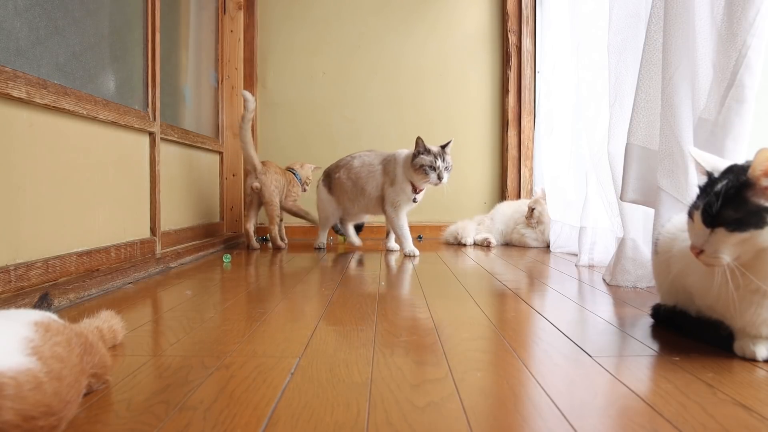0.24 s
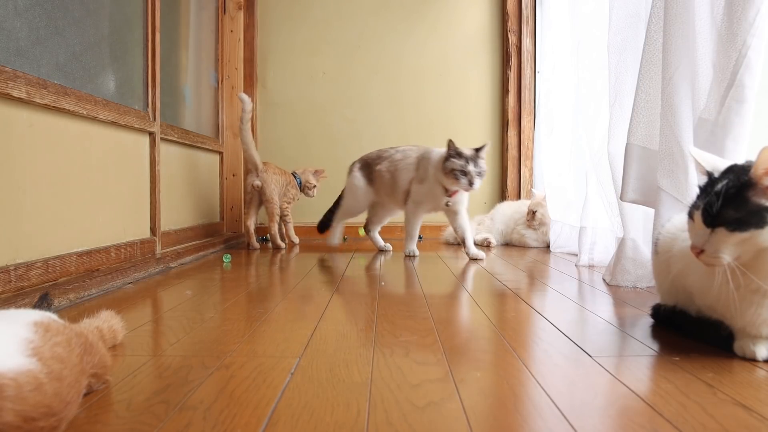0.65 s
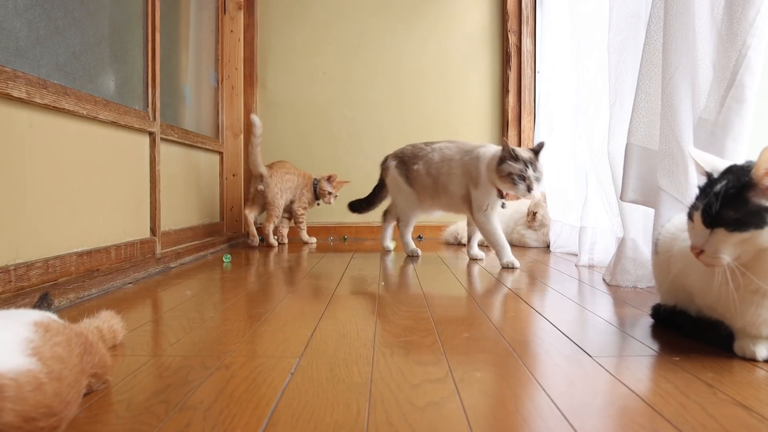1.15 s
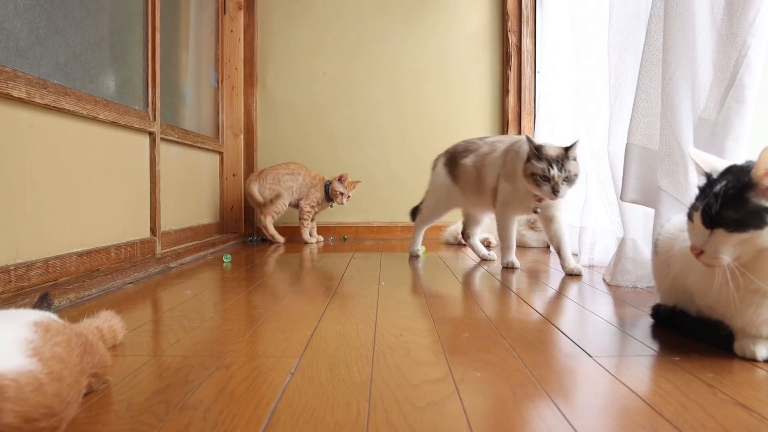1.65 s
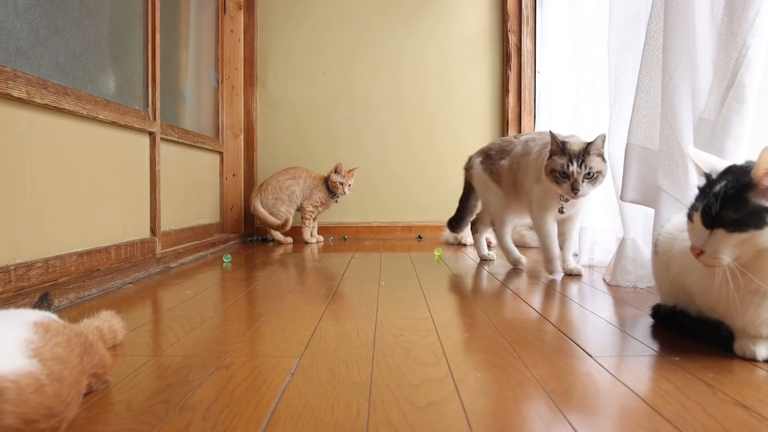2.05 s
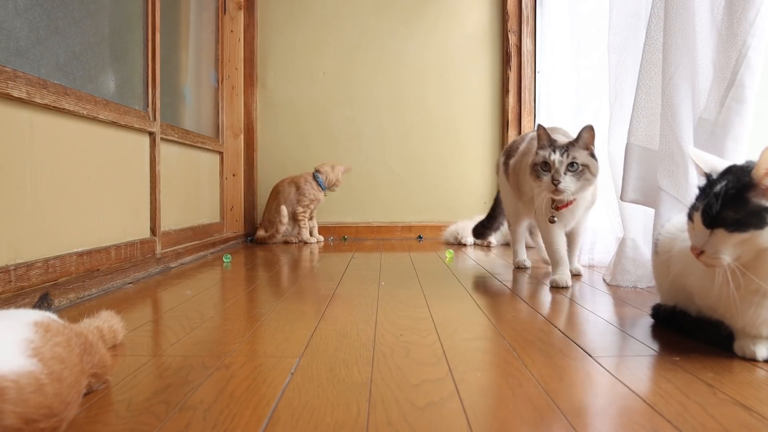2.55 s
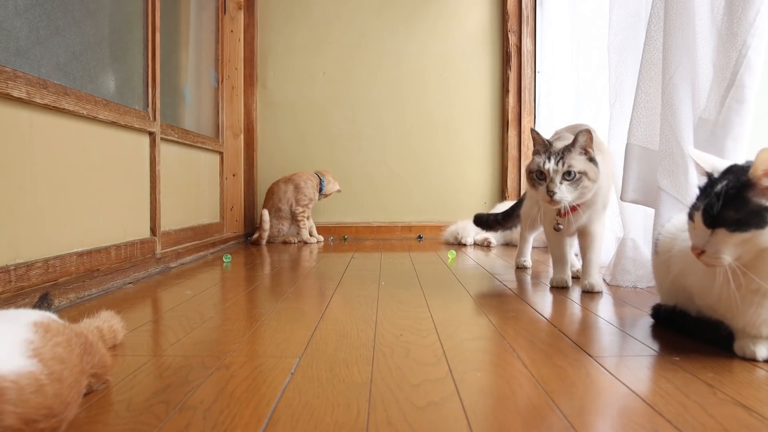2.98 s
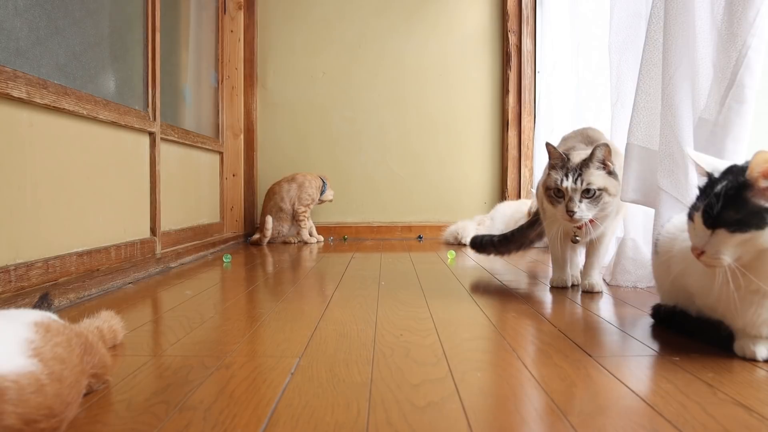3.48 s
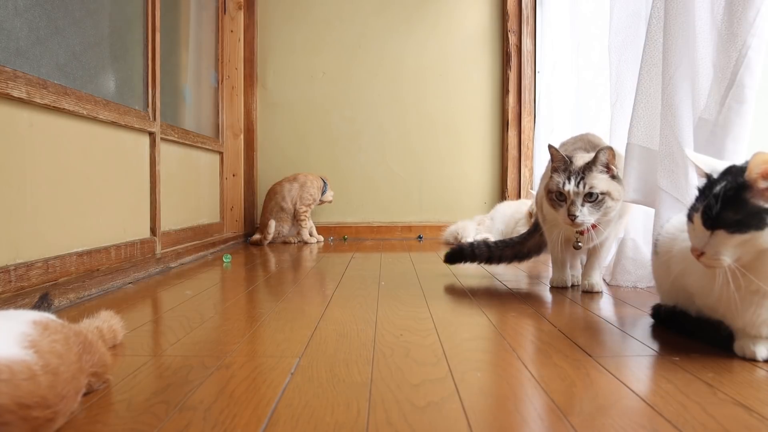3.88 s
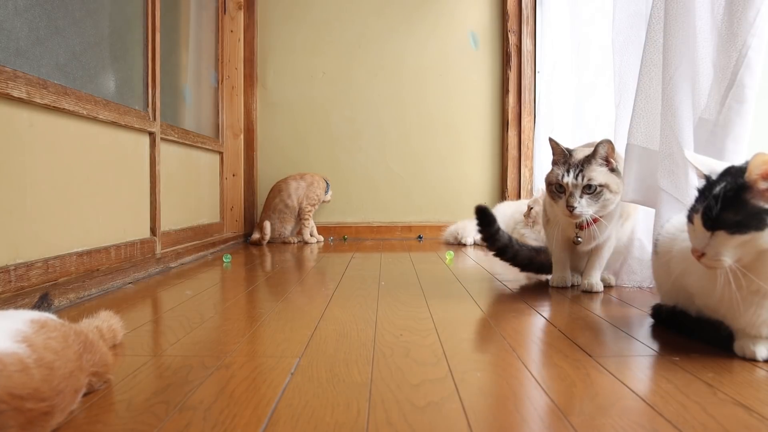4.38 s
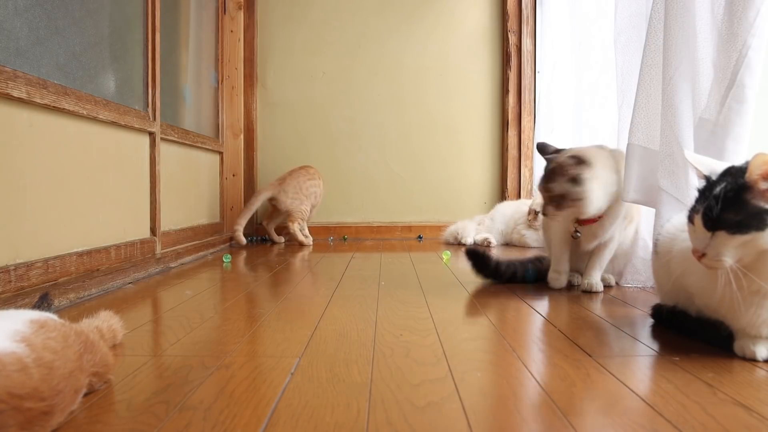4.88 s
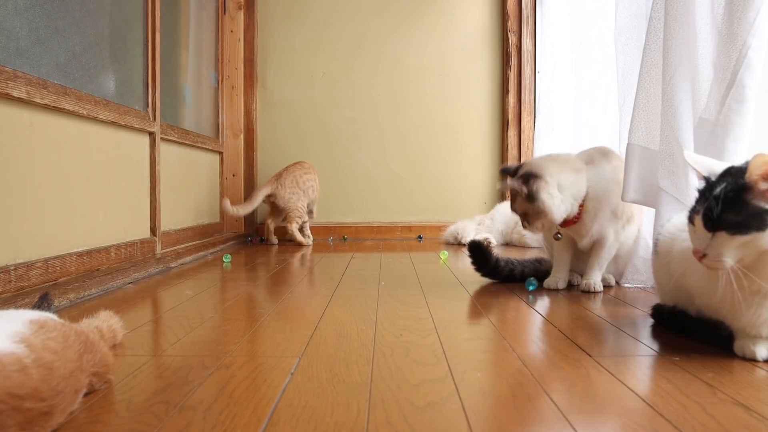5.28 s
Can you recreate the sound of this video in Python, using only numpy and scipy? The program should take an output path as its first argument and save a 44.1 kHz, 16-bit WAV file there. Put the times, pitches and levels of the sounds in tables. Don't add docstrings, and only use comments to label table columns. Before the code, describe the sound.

Dull, boomy bounces of rubber balls on indoor floorboards, with loud single landings, two dying runs, faint paw pads and a steady hum.

```python
import sys
import numpy as np
from scipy import signal
from scipy.fft import rfft, irfft, next_fast_len
from scipy.io import wavfile

SR = 44100
rng = np.random.default_rng(int(sys.argv[2]) if len(sys.argv) > 2 else 0)


def digitize_waveform(pressure):
    field = np.atleast_2d(pressure).T
    bounded = np.clip(field, -1, 1)
    quanta = np.round(bounded * 32767).astype(np.int16)
    wavfile.write(sys.argv[1], SR, quanta)


def to_linear_factor(level_db):
    exponent = np.asarray(level_db, float) / 20
    return 10 ** exponent


N = 243873
LEAD = SR // 10
AFTER = np.arange(int(.65 * SR)) / SR
THIRD_OCTAVE_EDGES_HZ = 25 * 2 ** (np.arange(29) / 3)

# start in seconds, peak in dB, bass in dB, slap in dB.
EARLIER_BOUNCES = [
    (-0.05, -8, -8, -29),
]
# start in seconds, peak in dB, bass in dB, slap in dB.
PANEL_BOUNCES = [
    (0.103, -11.5, -23.5, -26),
    (4.948, -26, -19, -14),
]
# start in seconds, peak in dB, bass in dB, slap in dB.
FAR_BOUNCES = [
    (0.384, -4.5, -15.5, -34.5),
    (0.624, -6, -12.5, -33),
    (0.82, -11, -6.5, -32),
]
# start in seconds, peak in dB.
SETTLING_KNOCKS = [
    (1.733, -29),
    (1.755, -35),
    (1.788, -38),
    (1.81, -33.5),
    (1.847, -38),
    (1.942, -35.5),
]
# start in seconds, peak in dB, bass in dB, slap in dB.
NEAR_BOUNCES = [
    (2.887, -1, -7.5, -31.5),
]
# start in seconds, peak in dB, bass in dB, slap in dB.
THROWN_BOUNCES = [
    (3.971, 0, -9.5, -31.5),
]
# start in seconds, peak in dB, bass in dB, slap in dB.
REBOUND_BOUNCES = [
    (4.046, -0.75, -5, -33.5),
]
# start in seconds, peak in dB, bass in dB, slap in dB.
MID_BOUNCES = [
    (4.728, -4, -11, -30.5),
    (5.016, -12, -10, -28.5),
    (5.148, -14, -10, -28.5),
    (5.288, -24, -4.5, -35),
    (5.367, -19, -9.5, -33),
    (5.434, -21.5, -9.5, -30),
    (5.489, -33.5, -10.5, -22),
]

# frequency in Hz, level in dB, packet length in ms.
PANEL_BOARDS = [(260, -4.5, 14), (431, 5.5, 19), (646, -11, 20.5), (790, -14.5, 12), (1016, -27, 33),
                (1444, -30, 37)]
# frequency in Hz, level in dB, packet length in ms.
FAR_BOARDS = [(140.6, 4, 20), (236, -4, 25.6), (326.4, -1, 20), (460.4, -2.5, 19.6), (635, -11.5, 27),
              (1055, -26, 22), (1615, -27.5, 20)]
# frequency in Hz, level in dB, packet length in ms.
RUN_BOARDS = [(132.7, 3, 18.5), (271, -13, 26.5), (334, -13, 20), (447.4, -7.5, 13.3), (618, -16.5, 12),
              (1448, -31, 14), (1898, -34.5, 18), (2800, -36.5, 14)]
# frequency in Hz, level in dB, packet length in ms.
NEAR_BOARDS = [(101.4, -1, 39.4), (180, -6, 18), (320, -14, 15), (461, -12.5, 16.5), (619, -12, 20),
               (833, -12.5, 17), (1080, -17, 12), (1526, -26.5, 27), (2950, -27, 5)]
# frequency in Hz, level in dB, packet length in ms.
THROWN_BOARDS = [(179.6, -2.5, 18), (301, -3.5, 20), (446.4, -2, 26), (618, -14, 20), (843, -12, 16),
                 (1500, -23, 16), (2580, -24, 7.1)]
# frequency in Hz, level in dB, packet length in ms.
REBOUND_BOARDS = [(141, -6.5, 18.3), (214, -1, 13), (452, -13, 22), (621, -13, 18), (850, -17.5, 18),
                  (1302, -24.5, 18)]
# frequency in Hz, level in dB, packet length in ms.
MID_BOARDS = [(93.7, -4, 96), (159.3, -1.5, 32.6), (238, -0.5, 21.4), (328.5, -2.5, 24.6), (418.6, -5, 20),
              (561, -10, 16.6), (720, -16.5, 24), (1290, -28.5, 18)]

# frequency in Hz, level in dB per Hz.
PANEL_TAIL = [(35, -42), (60, -39), (179, -19), (245, 6), (336, -11), (423, 3.5), (717, -18), (811, -18.5),
              (2210, -32.5), (4020, -48)]
# frequency in Hz, level in dB per Hz.
FAR_TAIL = [(35, -41.5), (60, -5.5), (104, 3), (221, -2), (478, -9.5), (634, -13), (680, -17), (870, -27.5),
            (2060, -30), (4020, -40)]
# frequency in Hz, level in dB per Hz.
RUN_TAIL = [(35, -28), (60, -3.5), (169, -2), (303, -13), (430, -9), (797, -32.5), (1640, -29),
            (1820, -34.5), (2170, -36), (4020, -47)]
# frequency in Hz, level in dB per Hz.
NEAR_TAIL = [(35, -28.5), (60, -2), (224, -3.5), (292, -4.5), (348, -7.5), (870, -16), (1190, -27),
             (1640, -23), (1920, -38.5), (2980, -36.5), (4020, -37)]
# frequency in Hz, level in dB per Hz.
THROWN_TAIL = [(35, -37.5), (60, -8), (217, -1.5), (645, -4.5), (783, -16), (917, -22), (1040, -14.5),
               (1450, -22.5), (1890, -38), (2170, -31.5), (4020, -38)]
# frequency in Hz, level in dB per Hz.
MID_TAIL = [(35, -30.5), (60, 0), (102, 0), (145, -2.5), (209, -2), (394, -7), (591, -11.5), (933, -32),
            (2330, -36.5), (4020, -50)]

# slap in dB, its low and high limits in Hz, its T60 in seconds.
PANEL_MIX = (-15.5, -51.5, -41, -5, 950), (3.5, 1.2, -13, 38), (-24.5, 899, 2500, 0.13)
FAR_MIX = (-19, -33, -34, -9, 799.5), (4, 0.74, -15.5, 42), (-29, 998.5, 4500.5, 0.1)
RUN_MIX = (-20, -30, -17.5, -15, 740), (3.5, 0.84, -15, 40), (-23.5, 1300, 3300, 0.03)
NEAR_MIX = (-15.5, -55, -19.5, 5, 1151), (3, 0.6, -23, 60.5), (-6.5, 1000, 5400, 0.0033)
THROWN_MIX = (-16.5, -52.5, -29, -1.5, 1100), (3, 0.7, -19, 40), (-16, 1000, 4500, 0.03)
REBOUND_MIX = (-17.5, -21.5, -28, -7, 1050), (4.0, 0.26, -13, 49.5), (-24, 1000, 3300, 0.01)
MID_MIX = (-17, -22, -24, -10, 921), (2.5, 0.45, -16.5, 45), (-23.5, 999, 4002, .025)

# frequency in Hz, T60 in seconds.
JOISTS = [(48.5, 0.68), (91.5, 0.72)]
# frequency in Hz, T60 in seconds.
ROOM_T60 = [(60, 0.36), (150, 0.47), (300, 0.29), (700, 0.3), (2000, 0.37), (5000, .35), (12000, .2)]
# frequency in Hz, left-right correlation from -1 to 1.
TAIL_LIKENESS = [(100, .9999), (230, 1), (500, 0.98), (1000, 0.63), (3000, 0.9), (10000, .5)]
# frequency in Hz, level in dB.
TREBLE = [(3800, 1.27), (5000, -0.5), (6300, -12), (8000, -19), (10000, -31), (13000, -32), (16000, -46.5)]
# frequency in Hz, level in dB per Hz.
HUM_COLOUR = [(15, -37), (25, -3.5), (48, -10), (104, 1.5), (128, -10.5), (146, -9.5), (219, -16.5),
              (238, -12.5), (334, -17.5), (380, -18.5), (545, -21), (799, -21.5), (1250, -23),
              (2310, -25.5), (4020, -32.5)]
# frequency in Hz, left-right correlation from -1 to 1.
HUM_LIKENESS = [(60, .9995), (110, 1), (190, 0.88), (350, 0.42), (620, 0.11), (2000, 0.84), (8000, 0.72)]
# start in seconds, length in seconds, level in dB, low and high limits in Hz.
SCUFFS = [
    (0.001, .012, -52.5, 900, 12000),
    (4.945, .07, -43, 1150, 1750),
    (4.97, .04, -62, 4500, 7500),
    (5.21, .045, -63, 5100, 6900),
]
# start in seconds, peak in dB, frequency in Hz.
PAWS = [(0.3, -40, 122), (2.104, -37.5, 129), (2.2, -38, 104), (2.338, -40, 99.6), (2.555, -33, 100),
        (3.158, -33, 102), (3.326, -35, 90), (3.452, -35, 101), (3.573, -35.5, 88), (3.652, -36, 83.4),
        (4.269, -40, 87), (4.413, -41.5, 86.1), (4.531, -42, 95.5)]
# start in seconds, frequency in Hz, level in dB, T60 in seconds.
COLLAR_BELL = (3.895, 10849.5, -70, .2)
# frequency in Hz, level of the right port over the left in dB.
RIGHT_GAIN = [(200, .2), (700, .5), (1500, 2), (5000, 2.6), (12000, 1.5)]


def at_hz(points, hz):
    points = np.array(points)
    return np.interp(np.log(hz), np.log(points[:, 0]), points[:, 1])


def band(x, low_hz, high_hz):
    edges = [low_hz, min(high_hz, .45 * SR)]
    return signal.sosfilt(signal.butter(2, edges, "band", fs=SR, output="sos"), x)


def low_pass(x, hz, order):
    return signal.sosfilt(signal.butter(order, hz, fs=SR, output="sos"), x)


def noise_bands(size, spectrum, likeness):
    white = rng.standard_normal((2, 2, size + LEAD))
    for k, (low, high) in enumerate(zip(THIRD_OCTAVE_EDGES_HZ, THIRD_OCTAVE_EDGES_HZ[1:])):
        mid, side = band(white[k % 2], low, high)[:, LEAD:]
        hz = np.sqrt(low * high)
        alike = np.clip(at_hz(likeness, hz), -1, 1)
        pair = np.sqrt(1 + alike) * mid + np.sqrt(1 - alike) * side * [[1], [-1]]
        yield hz, to_linear_factor(at_hz(spectrum, min(hz, 3800)) + at_hz(TREBLE, hz)) * pair


def part_of(hz):
    return int(hz > 200) + int(hz > 1000)


def board_packet(boards, contact_ms, swell_cycles, push_db, echo_db, echo_ms):
    packet = np.zeros((3, 2, len(AFTER)))
    for hz, db, ms in boards:
        swell = 1 - np.exp(-AFTER * hz / swell_cycles)
        passing = np.exp(-(AFTER * 1000 / ms) ** 2.8)
        packet[part_of(hz)] += to_linear_factor(db) * swell * passing * np.sin(2 * np.pi * hz * AFTER)
    packet /= np.abs(packet.sum(axis=0)).max()
    squeeze = np.clip(AFTER * 1000 / contact_ms, 0, 1)
    packet[1] += to_linear_factor(push_db) * np.sin(2 * np.pi * squeeze) * np.sin(np.pi * squeeze)
    packet = band(packet, 58, 6000)
    echo = np.roll(band(packet, 60, 700), int(echo_ms * SR / 1000), axis=-1)
    return packet + to_linear_factor(echo_db) * echo


def room_tail(tail, top_hz):
    room = np.zeros((3, 2, len(AFTER)))
    for hz, pair in noise_bands(len(AFTER), tail, TAIL_LIKENESS):
        build_up = 1 - np.exp(-(AFTER / (0.0066 + 3.8 / hz)) ** 2)
        room[part_of(hz)] += pair * build_up * to_linear_factor(-60 * AFTER / at_hz(ROOM_T60, hz))
    room[1] = low_pass(room[1], top_hz, order=8)
    high_pass = signal.butter(2, 1050, "high", fs=SR, output="sos")
    room[2] = signal.sosfilt(high_pass, low_pass(room[2], 8000, order=2))
    return_db, return_s = -6, .055
    room[2] += to_linear_factor(return_db) * np.roll(room[2], int(return_s * SR), axis=-1)
    return room / np.sqrt(np.mean(room.sum(axis=0)[:, SR // 30:SR // 10] ** 2))


def joist_boom(joist_db):
    boom = np.zeros(len(AFTER))
    for (hz, t60), db in zip(JOISTS, joist_db):
        answer = 1 - np.exp(-AFTER * hz / 4.0)
        boom += to_linear_factor(db - 60 * AFTER / t60) * answer * np.sin(2 * np.pi * hz * AFTER)
    return boom


def surface_slap(low_hz, high_hz, t60):
    shared, left, right = rng.standard_normal((3, len(AFTER)))
    slap = (shared + 0.84 * np.array([left, right])) * to_linear_factor(-60 * AFTER / t60)
    return band(band(slap, low_hz, high_hz), low_hz, high_hz)


def thud(boards, tail, mix):
    levels, contact, slap = mix
    tail_db, *joist_db, push_db, top_hz = levels
    contact_ms, swell_cycles, echo_db, echo_ms = contact
    slap_db, low_hz, high_hz, slap_t60 = slap
    out = board_packet(boards, contact_ms, swell_cycles, push_db, echo_db, echo_ms)
    out += to_linear_factor(tail_db - 4) * room_tail(tail, top_hz)
    out[0] += joist_boom(joist_db)
    out[2] += to_linear_factor(slap_db + 5) * surface_slap(low_hz, high_hz, slap_t60)
    return out


def bounces(events, response):
    bass_lift_db, slap_lift_db = 7.5, 29
    hard_top_hz, softening = 1300, 0.63
    wander_share, wander_turn = 0.045, 2.3
    out = np.zeros((2, N + LEAD + len(AFTER)))
    hardest_db = max(event[1] for event in events)
    bass, body, slap = response
    for k, (s, db, bass_db, slap_db) in enumerate(events):
        spot_time = AFTER * (1 + wander_share * np.sin(wander_turn * k))
        spot = [np.interp(spot_time, AFTER, side) for side in body]
        top_hz = hard_top_hz * to_linear_factor(max(softening * (db - hardest_db), -8))
        soft = low_pass(spot, top_hz, order=4)
        early = int(.4 * SR / hard_top_hz)
        thump = np.roll(soft, -early, axis=-1) + to_linear_factor(bass_db + bass_lift_db) * bass
        at = round(s * SR) + LEAD
        out[:, at:at + len(AFTER)] += to_linear_factor(db) * (thump + to_linear_factor(slap_db + slap_lift_db) * slap)
    return out[:, LEAD:LEAD + N]


def hum(level_db=-43, lumps_db=2.0, lumps_per_s=12):
    out, t = 0, np.arange(N) / SR
    for hz, pair in noise_bands(N, HUM_COLOUR, HUM_LIKENESS):
        lumps = np.interp(t * lumps_per_s, np.arange(200), rng.standard_normal(200))
        out = out + pair * to_linear_factor(lumps_db * lumps * min(1, 300 / hz))
    return to_linear_factor(level_db) * out / np.sqrt(np.mean(out ** 2))


def paw_scuffs():
    out, t = np.zeros((2, N)), np.arange(N) / SR
    for s, length, db, low_hz, high_hz in SCUFFS:
        stroke = np.sin(np.pi * np.clip((t - s) / length, 0, 1)) + 1e-9
        grit = rng.standard_normal(N) + 0.7 * rng.standard_normal((2, N))
        scrape = band(grit * stroke, low_hz, high_hz)
        out += to_linear_factor(db) * scrape * np.sqrt(SR / (high_hz - low_hz) / 2)
    return out


def paw_steps(rise_s=.012):
    out, t = np.zeros(N), np.arange(N) / SR
    for s, db, hz in PAWS:
        since = np.maximum(t - s, 0)
        push = np.e * since / rise_s * np.exp(-since / rise_s)
        out += to_linear_factor(db - 3) * push * np.sin(2 * np.pi * hz * since)
    return out


def run_of_bounces(count):
    start_s, flight_s, restitution = 0.9885, 0.1465, 0.85
    first_db, loss_db, loss_growth_db = -10.5, 1.15, 0.14
    bass_db, slap_db, slap_loss_db = -9, -26.5, 1.7
    k = np.arange(count)
    s = start_s + flight_s * (1 - restitution ** k) / (1 - restitution)
    db = first_db - loss_db * k - loss_growth_db * k * (k - 1) / 2
    run = list(zip(s, db, bass_db + 0 * k, slap_db - slap_loss_db * k))
    settling = [(knock_s, knock_db, -5, -40) for knock_s, knock_db in SETTLING_KNOCKS]   # bass, slap dB
    return run + settling


def collar_bell():
    t = np.arange(N) / SR
    s, hz, db, t60 = COLLAR_BELL
    return (t > s) * to_linear_factor(db - 60 * np.abs(t - s) / t60) * np.sin(2 * np.pi * hz * t)


def scene():
    return (bounces(EARLIER_BOUNCES + FAR_BOUNCES, thud(FAR_BOARDS, FAR_TAIL, FAR_MIX))
            + hum() + paw_scuffs()
            + bounces(PANEL_BOUNCES, thud(PANEL_BOARDS, PANEL_TAIL, PANEL_MIX))
            + paw_steps()
            + bounces(run_of_bounces(count=9), thud(RUN_BOARDS, RUN_TAIL, RUN_MIX))
            + bounces(NEAR_BOUNCES, thud(NEAR_BOARDS, NEAR_TAIL, NEAR_MIX))
            + collar_bell()
            + bounces(THROWN_BOUNCES, thud(THROWN_BOARDS, THROWN_TAIL, THROWN_MIX))
            + bounces(REBOUND_BOUNCES, thud(REBOUND_BOARDS, THROWN_TAIL, REBOUND_MIX))
            + bounces(MID_BOUNCES, thud(MID_BOARDS, MID_TAIL, MID_MIX)))


def microphone_ports(dry, lag_samples=4):
    size = next_fast_len(N + 64)
    hz = np.maximum(np.arange(size // 2 + 1) * SR / size, 1)
    tilt = to_linear_factor(at_hz(RIGHT_GAIN, hz) / 2)
    delay = np.exp(-2j * np.pi * hz * lag_samples / SR)
    return irfft(rfft(dry, size) * [1 / tilt, tilt * delay], size)[:, :N]


def gain_control(x):
    knee_db, wind_down_per_s, recovery_s, meter_s = -19.5, 7.5, 0.45, 0.035
    meter, rest = np.exp(-1 / (meter_s * SR)), np.exp(-1 / (recovery_s * SR))
    power = signal.lfilter([1 - meter], [1, -meter], np.mean(x ** 2, axis=0))
    excess_db = np.maximum(10 * np.log10(power + 1e-12) - knee_db, 0)
    cut_db = signal.lfilter([wind_down_per_s / SR], [1, -rest], excess_db)
    return x * to_linear_factor(-cut_db)


def top_cut(x):
    return signal.sosfilt(signal.butter(12, 15800, fs=SR, output="sos"), x)


def record(dry):
    mix = np.clip(gain_control(microphone_ports(dry)), -1, 1)
    return top_cut(mix)


dry = scene()
out = record(dry)
digitize_waveform(out)
```